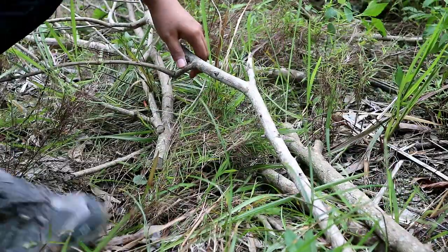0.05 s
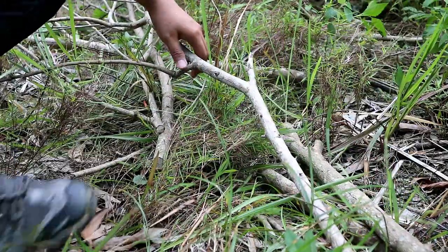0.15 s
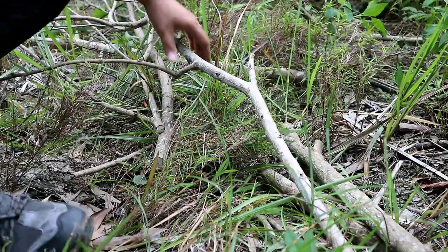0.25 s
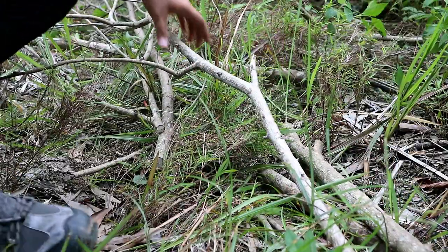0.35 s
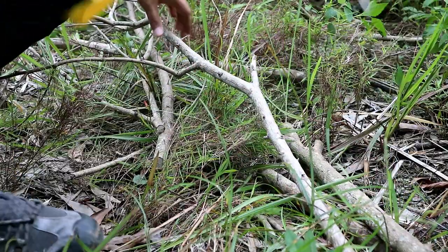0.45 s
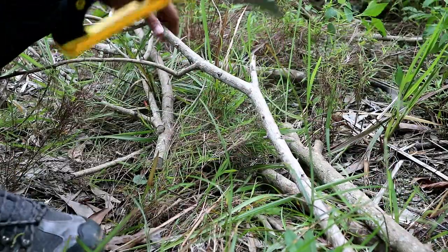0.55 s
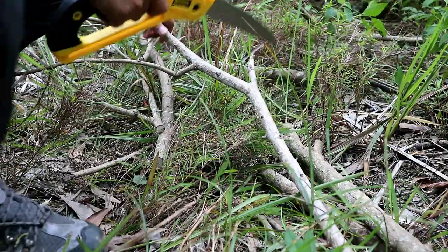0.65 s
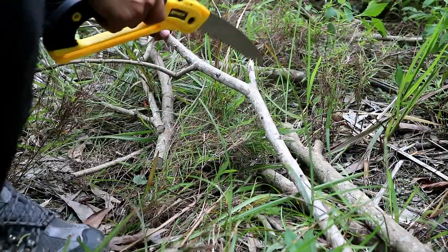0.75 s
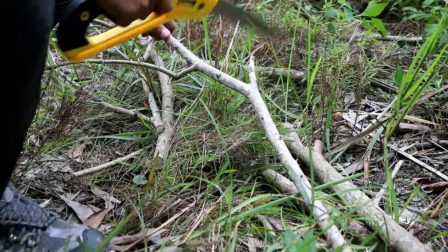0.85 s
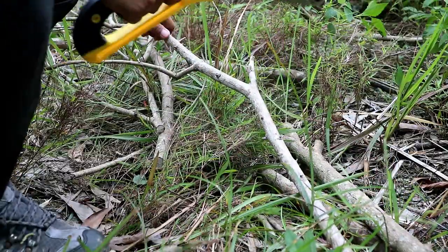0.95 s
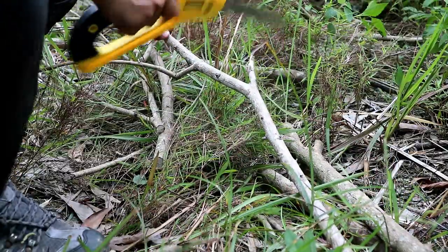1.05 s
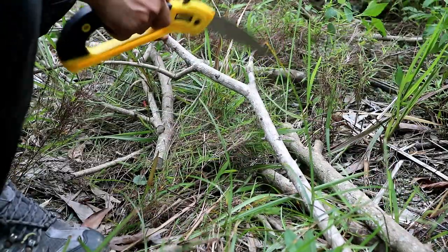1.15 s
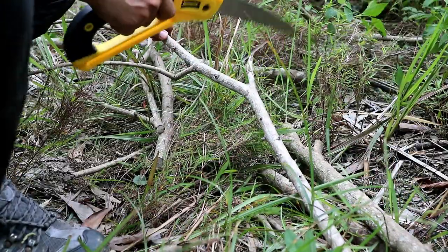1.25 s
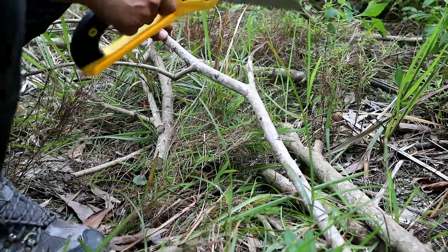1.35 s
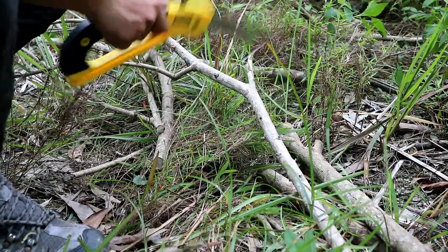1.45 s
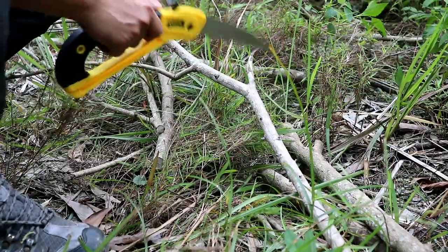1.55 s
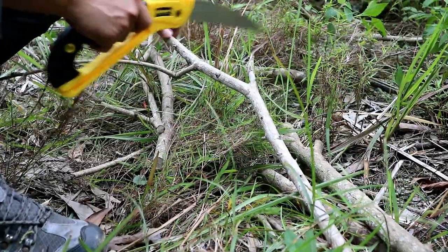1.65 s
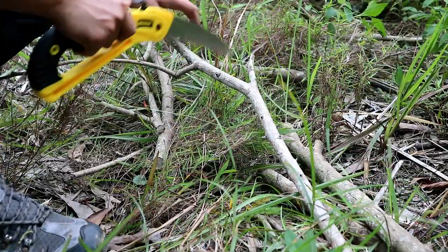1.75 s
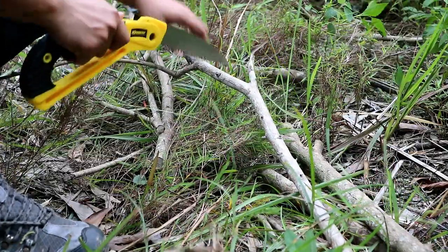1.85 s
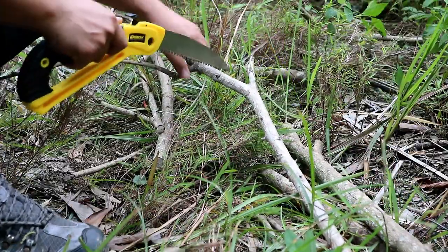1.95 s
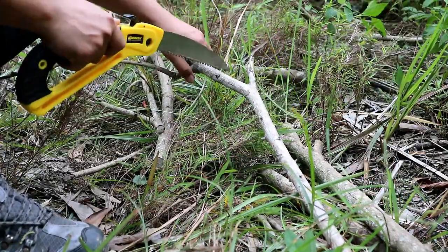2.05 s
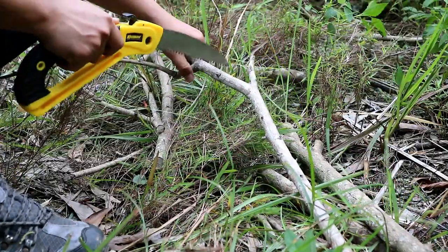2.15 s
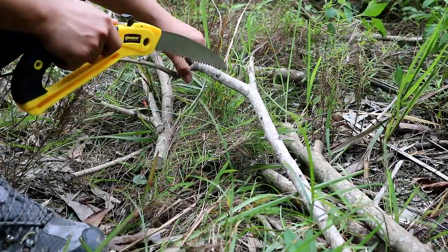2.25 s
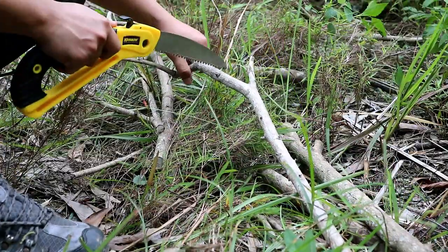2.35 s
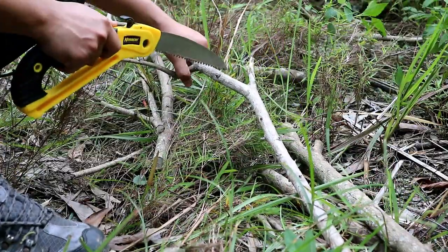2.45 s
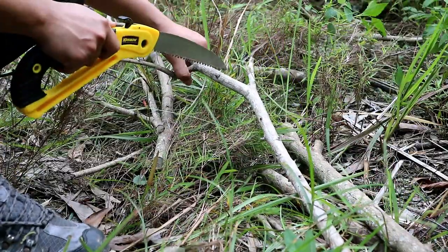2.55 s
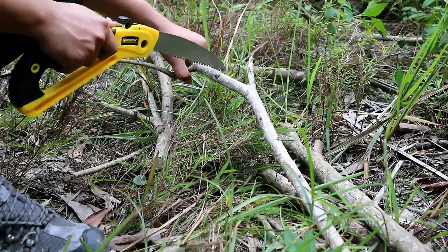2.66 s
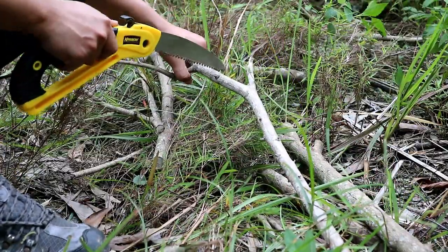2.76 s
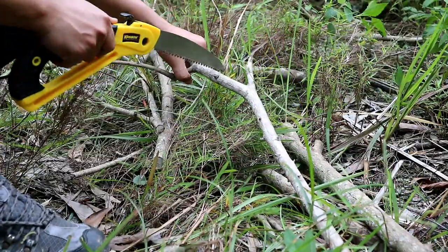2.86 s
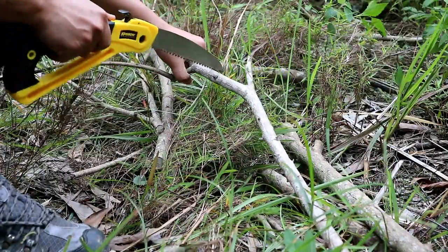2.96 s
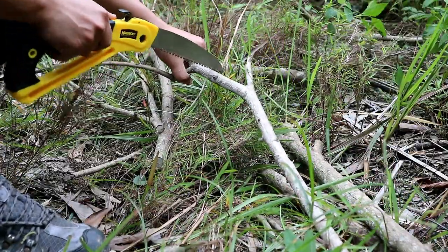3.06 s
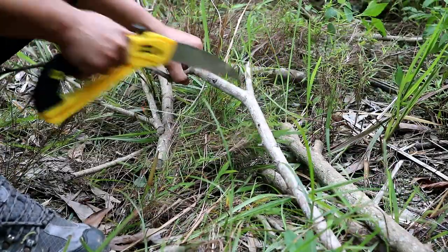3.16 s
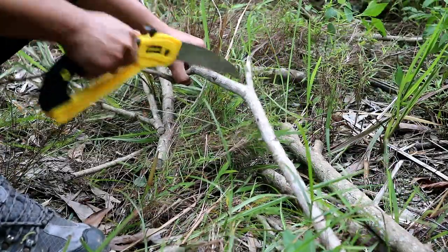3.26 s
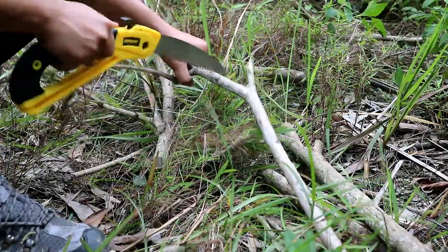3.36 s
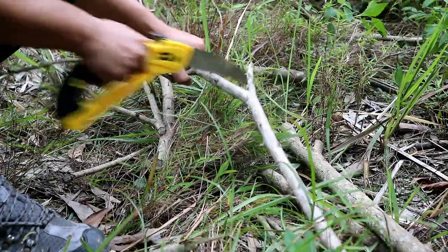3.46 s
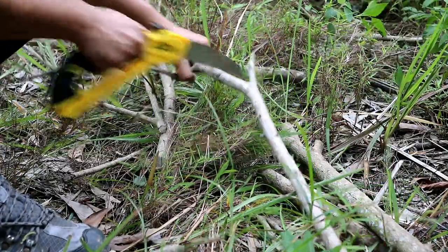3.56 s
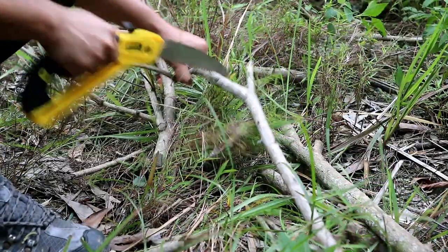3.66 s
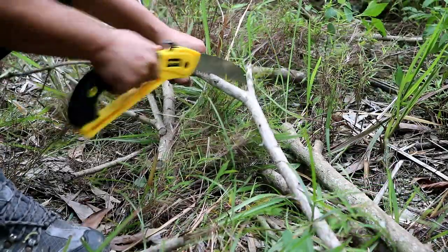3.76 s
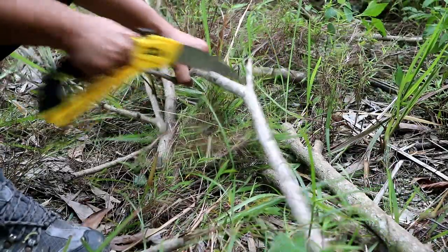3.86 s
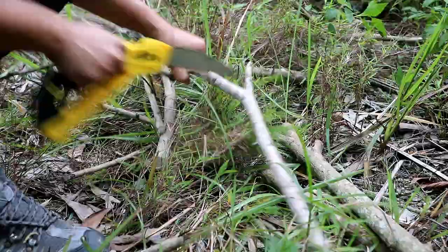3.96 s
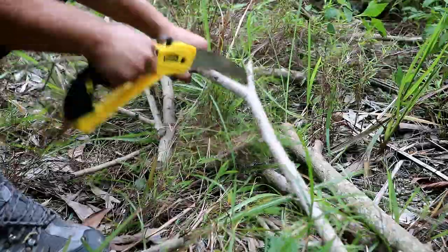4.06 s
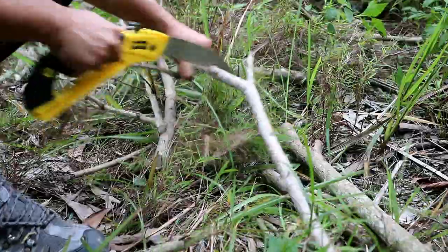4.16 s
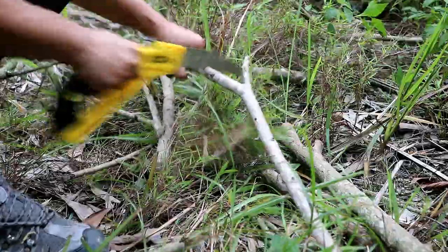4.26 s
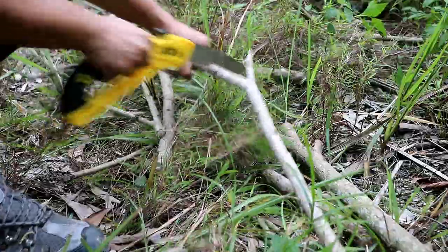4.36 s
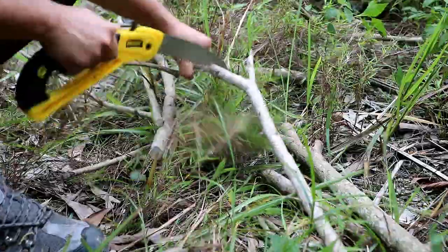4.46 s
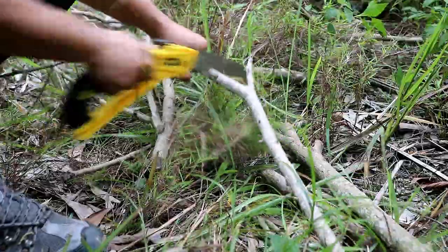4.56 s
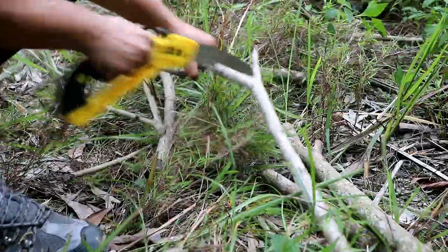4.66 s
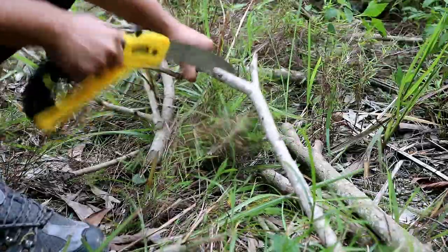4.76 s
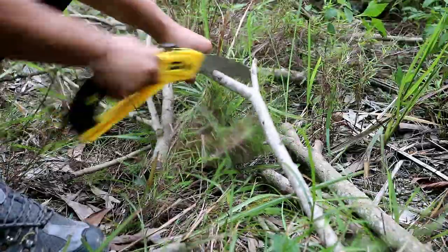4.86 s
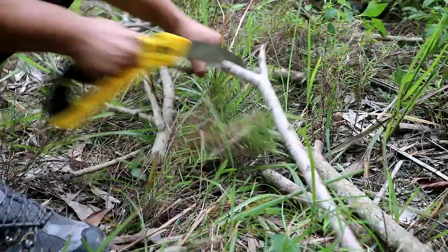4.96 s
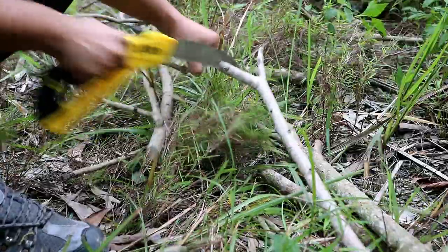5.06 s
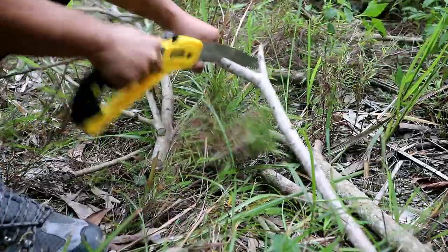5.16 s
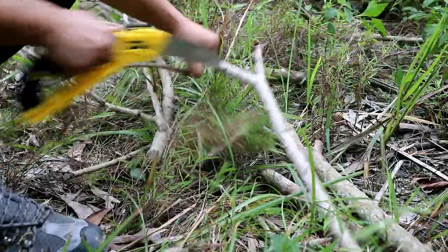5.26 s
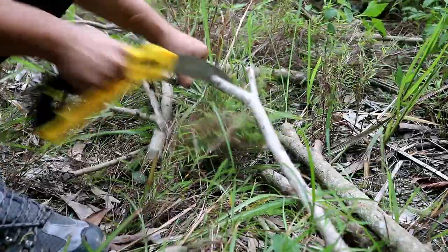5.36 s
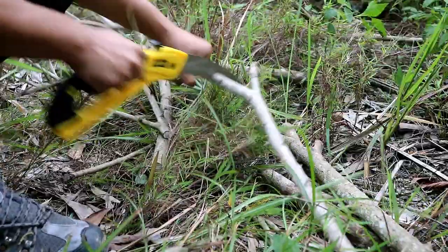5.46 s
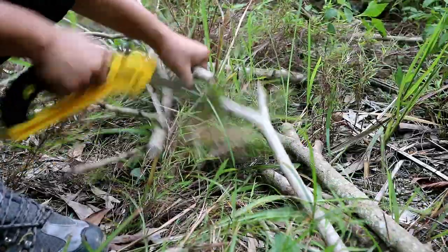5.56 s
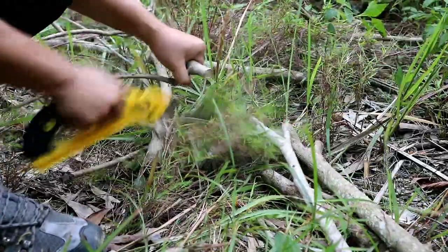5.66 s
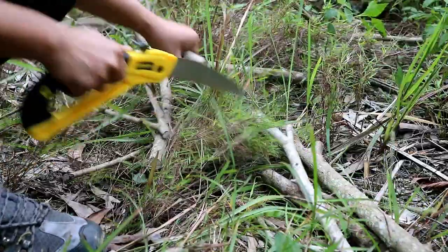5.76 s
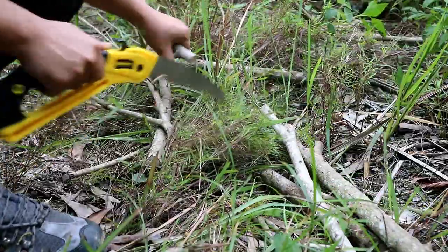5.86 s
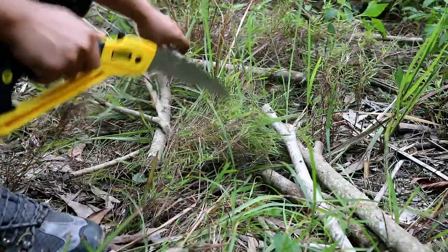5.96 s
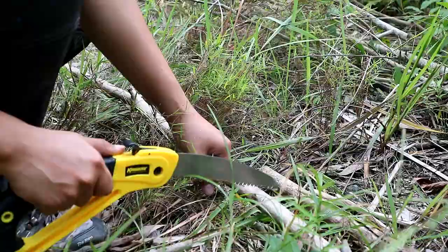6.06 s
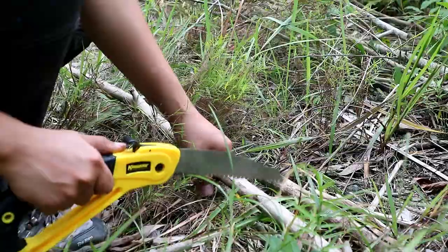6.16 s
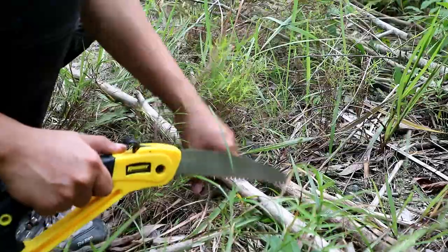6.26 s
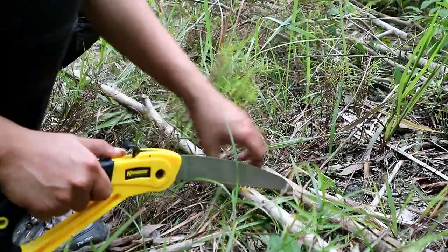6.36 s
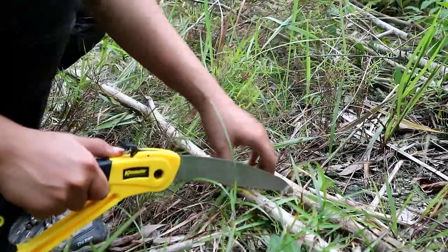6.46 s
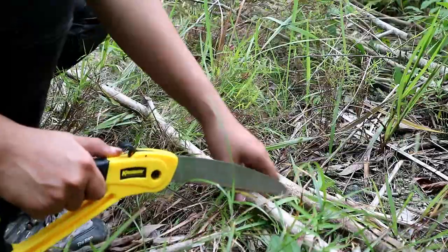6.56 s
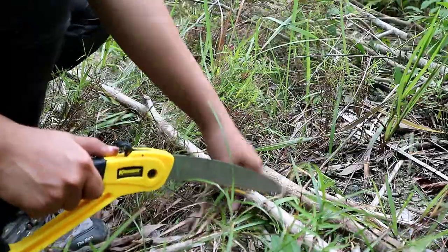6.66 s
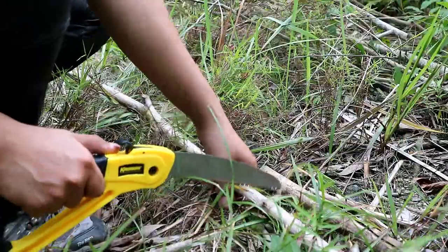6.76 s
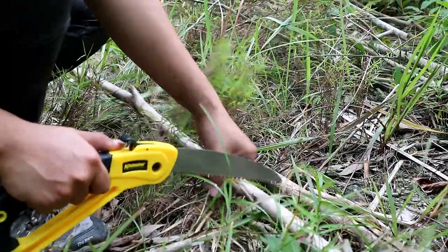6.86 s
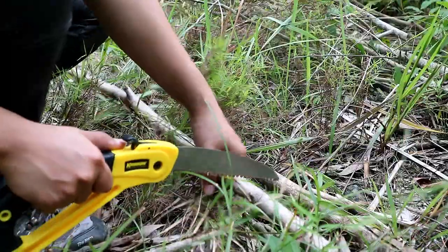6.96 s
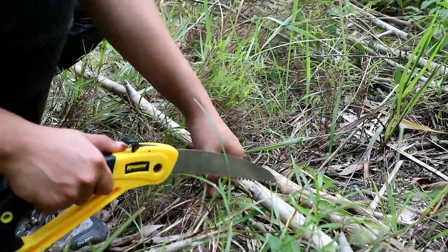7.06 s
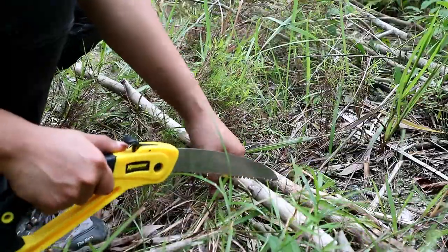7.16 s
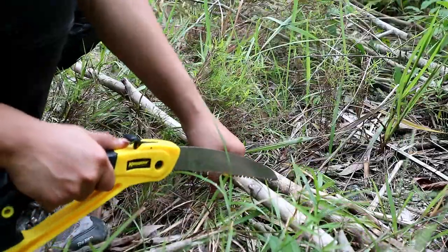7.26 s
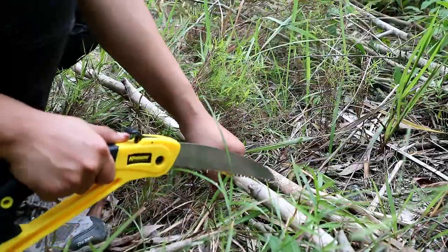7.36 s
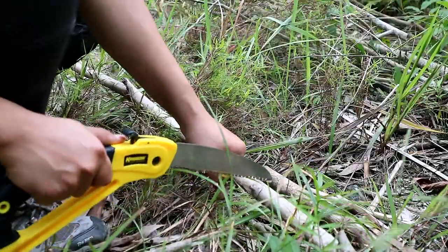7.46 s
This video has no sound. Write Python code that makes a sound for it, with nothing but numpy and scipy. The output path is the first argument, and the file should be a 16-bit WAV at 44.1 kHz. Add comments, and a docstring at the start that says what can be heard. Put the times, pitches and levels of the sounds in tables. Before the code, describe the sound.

Handling taps on wood and steel come first, over a soft airy wash and thin high crickets. A dulled far rooster calls. Seventeen rapid rasping strokes follow, bright, gritty and increasingly fizzy, peppered with splintering ticks. A hard snap ends the cut; the stick knocks and swishes into grass. Small leafy rustles close the nearby, dry outdoor scene.

```python
"""Sawing a dry branch

A folding saw is unfolded and set on a dry branch, cuts it in seventeen quick strokes; the branch cracks and drops
into the grass. Saw: tooth bites and fibre tears drive resonances. Cracks, taps, knocks: struck modes. Grass: clumped
grains. Air: shaped noise. Crickets: throbbing noise bands and drooping pips. Far rooster and low hum: gliding tones.
"""
import sys
import numpy as np
from scipy import signal
from scipy.fft import rfft, irfft
from scipy.io import wavfile
from scipy.ndimage import uniform_filter1d

SR = 44100
rng = np.random.default_rng(int(sys.argv[2]) if len(sys.argv) > 2 else 0)


def log_audio(samples):
    """Write samples as a 16-bit WAV file to the path given in sys.argv[1]."""
    # one column per channel
    frames = np.atleast_2d(samples).T
    # limit to full scale, then quantise
    limited = np.clip(frames, -1, 1)
    pcm = np.round(limited * 32767).astype(np.int16)
    wavfile.write(sys.argv[1], SR, pcm)


N = 331191


def amp(db):
    """Decibels to amplitude factor."""
    return 10 ** (np.asarray(db) / 20)


def evened(x):
    """Scales to an overall RMS of 1."""
    return x / np.sqrt(np.mean(x ** 2) + 1e-20)


def smooth_noise(shape, window):
    """White noise under a moving average of `window` samples."""
    return uniform_filter1d(rng.standard_normal(shape), window)


def butter(x, order, hz, kind="low"):
    """Butterworth filter."""
    return signal.sosfilt(signal.butter(order, hz, kind, fs=SR, output="sos"), x)


def read(points, hz):
    """Interpolates a table of (hz, value) along log frequency."""
    f, value = np.transpose(points)
    return np.interp(np.log(hz + 1), np.log(f + 1), value)


def add(mix, start_s, sound):
    """Adds a sound to the mix in place, cut at the end."""
    part = mix[..., round(start_s * SR):][..., :sound.shape[-1]]
    part += sound[..., :part.shape[-1]]


def panned(x, pan_db):
    """Sets the left-over-right level difference."""
    return x * amp([[pan_db / 2], [-pan_db / 2]])


def resonate(x, hz, width_hz):
    """Shifts the curve hz down to zero, smooths, shifts back: a resonance of gain 1."""
    turn = np.exp(2j * np.pi * np.cumsum(hz * np.ones(x.shape[-1])) / SR)
    r = np.exp(-np.pi * width_hz / SR)
    return 2 * (turn * signal.lfilter([1 - r], [1, -r], x / turn)).real


def coloured(x, points):
    """Filters by a spectrum in dB."""
    return irfft(rfft(x) * amp(read(points, np.fft.rfftfreq(N, 1 / SR))), N)


def grains(per_s, spread_db):
    """Random clicks, most small, a few large."""
    when, size, sign = rng.random(N), rng.exponential(1, N), rng.standard_normal(N)
    return (when < per_s / SR) * amp(spread_db * np.minimum(size, 5)) * sign


def struck(modes, push, tick_db, dull, rattle_t60_s, low_hz):
    """A push and a rattle ring the modes, a little unlike in each ear; peak 1. A dull blow loses treble."""
    t = np.arange(5000) / SR
    noise = rng.standard_normal((3, len(t)))
    lumps_db = 2.5 * evened(smooth_noise(len(t), 60))
    rattle = (noise[0] + .5 * noise[1:]) * amp(lumps_db - 60 * t / rattle_t60_s)
    force = (t == 0) * push + rattle
    ring = 0
    for k, (hz, db, decay_s) in enumerate(modes):
        detuned_hz = hz * rng.uniform(.97, 1.03)
        ring = ring + (-1) ** k * amp(db) * evened(resonate(force, detuned_hz, 3.2 / decay_s))
    tick = amp(tick_db - 60 * t / 0.031) * noise[1:]
    blow = butter(ring / abs(ring).max() + tick, 2, [low_hz, 9000], "band")
    blow = signal.lfilter([1], [1, -np.clip(dull, 0, .9)], blow)
    return blow / abs(blow).max()


# air spectrum: hz, relative_db_per_hz
AIR_SPECTRUM = [(15, -37), (35, -11), (58, 1), (75, -5), (100, -4), (129, -1), (378, 2.5), (509, 2),
                (1530, -10.5), (2770, -13), (3340, -15.5), (4620, -13.5), (6730, -17.5), (7700, -2),
                (8580, -33.5), (11500, -34), (12800, -32), (15500, -49.5)]
# left-right correlation of the air: hz, likeness
AIR_LIKENESS = [(60, -0.18), (180, -0.83), (550, -0.77), (1650, -0.22), (4970, -0.41), (15000, -0.26)]
AIR_DB = -56.5


def air():
    """Steady wash of far wind and traffic: noise spectrum with drifting patches."""
    frames, hz = N // 256 + 5, np.fft.rfftfreq(1024, 1 / SR)
    a, b, c, d, patches = rng.standard_normal((frames, 513, 5)).T
    patches = evened(uniform_filter1d(uniform_filter1d(patches, 12, 0), 14, 1))
    same = np.clip(read(AIR_LIKENESS, hz), -1, 1)[:, None]
    left = a + 1j * b
    right = same * left + np.sqrt(1 - same ** 2) * (c + 1j * d)
    z = np.array([left, right]) * amp(read(AIR_SPECTRUM, hz)[:, None] + 2.2 * patches)
    return amp(AIR_DB) * evened(signal.istft(z, nperseg=1024, noverlap=768)[1][:, :N])


# far crickets: hz, width_hz (of each of two passes), relative_db
CHORUS_BANDS = [(7160, 100, -6), (7580, 80, -1.5), (7795, 72, 0)]
# trills of a nearer cricket: start_s, length_s, relative_db
CRICKET_TRILLS = [(0.026, 0.08, -64), (2.688, 0.175, -67), (2.916, .12, -70), (6.02, .05, -75),
                  (6.17, 0.15, -68), (7.138, 0.18, -65)]
CHORUS_DB = -66


def chorus(t):
    """Narrow noise bands throb in wing strokes grouped by about three."""
    drift = 2 * np.pi * np.cumsum(1 + 0.0906 * evened(smooth_noise(N, 9000))) / SR
    throb = (1 + .5 * np.sin(18.8 * drift)) * (1 + 0.18 * np.sin(54 * drift))
    hiss = rng.standard_normal((2, N))
    bands = sum(amp(db) * evened(resonate(resonate(hiss, hz, w), hz, w)) for hz, w, db in CHORUS_BANDS)
    return amp(CHORUS_DB) * evened(throb * bands)


def crickets():
    """A throbbing chorus; one cricket trills in pips that droop at the end."""
    t = np.arange(N) / SR
    out = chorus(t)
    for start_s, length_s, db in CRICKET_TRILLS:
        u = t[:round(length_s * SR)]
        phase = np.minimum(u * 32. % 1 / .9, 1)  # 32 pips/s, each fills most of its beat
        pitch_hz = 4870 - 380 * phase ** 3.5 + 500.0 * smooth_noise(len(u), 60)
        pips = np.sin(2 * np.pi * np.cumsum(pitch_hz) / SR) * np.sin(np.pi * phase ** .6) ** 1.5
        # a soft noise band fills between the pips
        blur = .18 * evened(resonate(resonate(rng.standard_normal(len(u)), 4620, 450), 4620, 450))
        swell = np.sin(np.pi * u / length_s) ** 1.2
        add(out, start_s, panned(amp(db - 3.) * 2 * (pips + blur) * swell, 0))
    return out


# crow, a table a syllable, the last two being two lines of the hoarse long one: time_s, pitch_hz, level_db
CROW_SYLLABLES = [
    [(1.87, 540, -79), (1.92, 542, -54.5), (1.96, 555, -77)],
    [(2.07, 500, -85), (2.112, 570, -59), (2.16, 620, -80)],
    [(2.13, 701, -68), (2.168, 715, -58), (2.242, 723, -61), (2.26, 686, -74)],
    [(2.44, 590, -65), (2.76, 572, -66)],
    [(2.42, 536, -64), (2.47, 715, -66), (2.6, 735, -63), (2.772, 673, -60), (2.822, 648, -69),
     (2.858, 559, -62), (2.91, 556, -57), (2.93, 528, -74)],
]


def rooster():
    """A wavering, hoarse tone that distance has dulled to its lowest partial, with long echoes."""
    voice = np.zeros(N)
    for rows in CROW_SYLLABLES:
        s, hz, db = np.transpose(rows)
        t = np.arange(s[0], s[-1], 1 / SR)
        waver = 1 + 0.028 * evened(smooth_noise(len(t), 300))
        tone = np.sin(2 * np.pi * np.cumsum(np.interp(t, s, hz) * waver) / SR)
        add(voice, s[0], amp(np.interp(t, s, db)) * tone * signal.windows.tukey(len(t), .2))
    t = np.arange(SR // 2) / SR
    echoes = rng.standard_normal((2, len(t))) * amp(-60 * t / 0.4)
    echoes = echoes / np.linalg.norm(echoes[0])
    return panned(voice, 9.0) + amp(-1.5) * signal.oaconvolve(voice[None], echoes, axes=1)[:, :N]


# low hum that wavers under the sawing: time_s, pitch_hz, level_db
HUM_GLIDE = [(3.92, 147, -66), (4.02, 125, -62), (4.112, 115, -63), (4.22, 114, -68), (4.304, 128, -69),
             (4.516, 118, -67), (4.728, 130, -69), (4.852, 158, -66), (4.958, 131, -62), (5.06, 112, -68)]


def hum():
    """One soft low gliding sine, out of step in the two channels."""
    s, hz, db = np.transpose(HUM_GLIDE)
    t = np.arange(s[0], s[-1], 1 / SR)
    out = np.zeros((2, N))
    lead_rad = np.array([[0], [1.2]])
    tone = amp(np.interp(t, s, db)) * np.sin(2 * np.pi * np.cumsum(np.interp(t, s, hz)) / SR + lead_rad)
    add(out, s[0], tone * signal.windows.tukey(len(t), .1))
    return out


# swishes of grass, some swelling slowly; near 6.06 s the sound breaks off abruptly: # peak_s, relative_db,
# swell_s_per_10db, fade_s_per_10db, tilt_db_per_octave
GRASS_SWISHES = [(.24, -58, .55, .5, -1.2), (1.82, -70, .9, 2.5, -4), (5.44, -52, .02, .2, 2),
                 (5.53, -38, .006, .09, 2), (5.72, -43, .03, .03, -1.5), (5.8, -49.5, .08, .08, -.3),
                 (5.99, -50, .16, .05, .1), (6.062, -56, .1, .008, -1), (6.22, -68, .015, .3, 2.5),
                 (6.42, -63, .3, .07, 1.2), (6.69, -63.5, .14, .3, 2), (6.846, -58, .04, .11, 1.5),
                 (7.008, -56.5, .04, .09, .1), (7.474, -63.5, .07, .04, 2.5)]
# leaf spectrum: hz, relative_db_per_hz
LEAF_SPECTRUM = [(88, -41), (150, -7.5), (263, -10), (618, -0.5), (1000, -1), (1760, -2), (2860, -2),
                 (5650, -7.5), (7560, -13.5), (15500, -28)]


def rustle():
    """Clumps of tiny leaf snaps over a soft swish."""
    t = np.arange(N) / SR
    s, db, swell, fade, tilt_db = np.transpose(GRASS_SWISHES)[..., None]
    clumps = amp(1.4 * evened(smooth_noise(N, 500)))
    shared = grains(3000, 2.8) * clumps
    pair = np.array([evened(shared) + 1.4 * evened(grains(8000, 0.71) * clumps) for _ in range(2)])
    hz, frame_s, z = signal.stft(coloured(pair, LEAF_SPECTRUM), SR, nperseg=256)
    # levels refer to the 1-4 kHz band
    band = butter(coloured(pair.mean(0), LEAF_SPECTRUM), 2, [1000, 4000], "band")
    z = z / np.sqrt(np.mean(band ** 2))
    power = amp(db - 10 * np.maximum((s - t) / swell, (t - s) / fade)) ** 2
    tilt_db = np.interp(frame_s, t, (tilt_db * power).sum(0) / power.sum(0))
    z = z * amp(np.log2((hz[:, None] + 100) / 2000) * tilt_db)
    return panned(signal.istft(z, SR, nperseg=256)[1][:, :N] * np.sqrt(power.sum(0)), 3.5)


# the steel blade is touched or clicks: start_s, peak_db, left_right_db, ring_hz, tick_over_ring_db, rattle_t60_s
BLADE_TAPS = [(0.237, -43, 17, 2900, -5, .06), (0.26, -42, 18, 2850, 1, .06),
              (1.153, -23.5, 3, 2850, -2, .03), (1.163, -38, 3, 2850, -8, .07),
              (1.1775, -38, 3.5, 2720, -5, .04), (1.1905, -44, 3, 2750, -8, .09),
              (1.477, -50, 9, 3100, -4, .02), (1.5288, -33, 4, 3000, -5, .05),
              (1.538, -44, 3, 2750, -3, .08), (1.556, -43, 2, 2950, -2, .08),
              (1.602, -50, 2, 4550, -12, .03), (1.952, -46, 1, 3000, -12, .07),
              (1.967, -46, 1, 4550, -8, .03), (2.135, -36, 2, 2950, -12, .055),
              (2.2508, -47, 3.0, 2600, -3, .03), (5.7255, -28, 0, 2680, -8, .025)]
# blade modes: multiple_of_ring, relative_db, decay_s (to -87 dB)
STEEL_MODES = [(0.61, -13, 0.02), (.93, -2, .016), (1, 0, .018), (1.07, -2, 0.016), (1.2, -7, .01),
               (1.55, -5, 0.008), (1.7, -7, .012), (2.05, -11, 0.013)]
# sticks and handle knock: start_s, peak_db, pitch_hz, decay_s (divided per mode below), left_right_db
STICK_KNOCKS = [(0.265, -44, 840, 0.022, 16), (0.392, -53, 651, 0.044, 10), (0.704, -43, 716, 0.02, 10),
                (0.775, -42, 684, 0.025, 11), (0.803, -47, 666, 0.02, 9), (0.883, -47, 900, 0.012, 6),
                (0.906, -45, 293, 0.06, 3.0), (.905, -45, 1000, .012, 6), (.9155, -42, 950, .012, 8),
                (0.931, -35, 900, 0.013, 8), (.9375, -42, 1100, .016, 8), (.955, -46, 900, .012, 8),
                (0.9655, -38, 800, 0.017, 11), (1.1525, -31, 1250, 0.04, -1), (1.158, -46, 330, .07, 0),
                (1.166, -47, 1150, .03, 0), (1.192, -52, 950, .03, 0), (1.209, -53, 1050, .04, 0),
                (1.333, -37, 840, 0.016, 6), (1.527, -41, 1390, 0.02, -5), (1.532, -45, 330, .05, 0),
                (1.968, -52, 1100, .02, 2), (2.271, -37.5, 794, 0.018, 8), (5.5405, -19, 1200, 0.025, -1),
                (5.549, -28, 1100, .03, -1), (5.606, -37, 750, 0.036, 4), (5.712, -26, 1350, 0.03, -8),
                (5.716, -31, 900, .04, -8), (6.421, -50, 1860, 0.03, -4), (7.002, -56, 1090, 0.03, 1.5)]


def handling():
    """Taps rattle the blade; knocks are a few damped cycles of wood or plastic."""
    out = np.zeros((2, N))
    for s, db, pan_db, hz, tick_db, rattle_s in BLADE_TAPS:
        modes = [(ratio * hz, *rest) for ratio, *rest in STEEL_MODES]
        add(out, s, panned(amp(db) * struck(modes, 15., tick_db, 0.6, rattle_s, 260), pan_db))
    for s, db, hz, decay_s, pan_db in STICK_KNOCKS:
        modes = [(hz, 0, decay_s / 1.38), (1.5 * hz, -7, decay_s / 2.9),
                 (2.1 * hz, -5, decay_s / 2.5), (3.8 * hz, -18, decay_s / 2.5)]
        add(out, s, panned(amp(db) * struck(modes, 7., -22.0, 0.62, .7 * decay_s, 142), pan_db))
    return out


# fibres and twigs snap: start_s, peak_db, dullness_0_to_1, rattle_t60_s
WOOD_CRACKS = [(0.915, -46, 0.2, .014), (0.938, -48, 0.2, .014), (2.9372, -48, 0.3, .014),
               (2.9674, -45, 0.3, .014), (3.1743, -21, 0.9, .014), (3.3528, -19, 0.5, .014),
               (3.6062, -22, 0.3, .008), (3.6232, -21, 0.3, .006), (3.6396, -19.5, 0.8, .014),
               (3.6671, -11, 0.3, .005), (3.864, -21, .6, .01), (3.9165, -20, .5, .008),
               (4.2986, -24, 0.9, .008), (4.493, -26, .8, .014), (4.7374, -22, 0.64, .006),
               (5.0793, -15, 0.14, .014), (5.2464, -22.5, .9, .014), (5.3616, -13, 0.5, .005),
               (5.366, -16, 0.4, .005), (5.3987, -12, 0.2, .016), (5.405, -21, 0.6, .014),
               (5.4106, -3.5, 0.5, .006), (5.4134, -17, 0.7, .03), (5.433, -18.5, 0.5, .016),
               (5.4415, -24, 0.4, .014), (5.461, -28, 0.6, .014), (5.53, -6, 0, .03),
               (5.5665, -24, 0.1, .03), (5.756, -30, 0, .03), (5.797, -33, 0.1, .04),
               (6.239, -50, .2, .014), (6.287, -52, 0, .014), (6.332, -49, .4, .014),
               (6.6175, -46, 0.3, .014), (6.968, -44, 0.2, .014), (7.099, -44, 0.2, .014)]
# splinter modes: hz, relative_db, decay_s (to -87 dB)
SPLINTER_MODES = [(1900, -8.5, 0.015), (2590, 0, 0.0073), (3300, -1, 0.0079), (3830, -2, 0.015),
                  (4970, 1, .005), (6500, -1, 0.0033), (8400, -7, .003)]


def cracks():
    """Dry wood snaps: a tick and a very short ring."""
    out = np.zeros((2, N))
    for s, db, dull, rattle_s in WOOD_CRACKS:
        add(out, s, amp(db) * struck(SPLINTER_MODES, 10.0, -13.0, dull, rattle_s, 1500))
    return out


# one row a stroke: full_bite_s, rise_s, hold_s, bite_db, lean_over_hold_db, blade_ring_hz,
# thrum_over_bite_db, outer_ring_modes_db
SAW_STROKES = [(3.157, .024, .058, -30, -5, 2865, -12, -5), (3.308, .011, .064, -35, 4, 2790, -15, -5),
               (3.457, .049, .042, -31, 3, 2950, -14, -5), (3.585, .02, .079, -31, 1, 2780, -16, -3),
               (3.712, .05, .08, -30.5, -1, 2760, -13, -2), (3.866, .022, .061, -30, 0, 2770, -14, -1),
               (3.995, .04, .082, -31, -4, 2600, -13, -1), (4.13, .026, .082, -33, -6, 2650, -12, -1),
               (4.255, .008, .07, -33, 0, 2795, -11, -2), (4.404, .02, .082, -33, -2, 2850, -10, -1),
               (4.569, .069, .052, -29.5, -6, 2970, -10, -1), (4.69, .03, .074, -35, 4, 2680, -10, 0),
               (4.854, .075, .046, -32.5, 1, 3050, -11, 4), (4.962, .015, .066, -32, 3, 2990, -14, 2),
               (5.079, .003, .071, -38, 10, 3100, -14, 2), (5.246, .019, .064, -32, 2, 3200, -15, 2),
               (5.366, .01, .085, -39, -2, 3050, -10, 0)]
# the blade rests where it turns and peaks mid-hold
REST_DB, FALL_DB_PER_S, FULL_DB, ARCH_DB = -51.5, 475, -32, 1.4
# thrum and fizz grow along the hold and sink less than the blade at the turns (linger: dB per dB)
THRUM_SWELL_DB, THRUM_LINGER = 4, .35
FIZZ_DB, FIZZ_SWELL_DB, FIZZ_LINGER, FIZZ_GROWTH_DB_PER_S = -6, 2.5, .25, .8  # deeper cut, more fizz


def strokes(t):
    """Each stroke rises, holds and falls at one rate; ring and thrum glide from stroke to stroke."""
    bite_db, along = np.full(N, float(REST_DB)), np.zeros(N)
    for s, rise, hold, db, lean_db, *_ in SAW_STROKES:
        knots_db = [REST_DB, db, db + lean_db / 2 + ARCH_DB, db + lean_db]
        shape_db = np.interp(t, [s - rise, s, s + hold / 2, s + hold], knots_db)
        shape_db = shape_db - FALL_DB_PER_S * np.maximum(t - s - hold, 0)
        along = np.where(shape_db > bite_db, np.clip((t - s) / hold, 0, 1) - .5, along)
        bite_db = np.maximum(bite_db, shape_db)
    s, _, hold, _, _, hz, thrum_db, top_db = np.transpose(SAW_STROKES)
    middle_s = s + hold / 2
    slack_db = np.maximum(FULL_DB - bite_db, 0)
    thrum_db = np.interp(t, middle_s, thrum_db) + THRUM_SWELL_DB * along + THRUM_LINGER * slack_db
    fizz_db = FIZZ_DB + FIZZ_GROWTH_DB_PER_S * (t - s[0]) + FIZZ_SWELL_DB * along + FIZZ_LINGER * slack_db
    return bite_db, np.interp(t, middle_s, hz), thrum_db, fizz_db, np.interp(t, middle_s, top_db)


TEETH_PER_S, TEARS_PER_S = 330, 5000  # teeth: mean rate at full speed


def tooth_bites(t, bite_db):
    """Uneven decaying bites, one a tooth; harder bite means faster teeth."""
    speed = np.clip((bite_db - REST_DB) / (FULL_DB - REST_DB), .2, 1)
    count = np.cumsum(TEETH_PER_S * speed * (1 + 4. * smooth_noise(N, 200))) / SR
    tooth = amp(3.6 * rng.standard_normal(N)[count.astype(int) % N])
    return .6 + np.exp(-(count % 1) / .4) * tooth


def tears(bites, grip, apart):
    """Tear grains shaped by the bites; both ears share most, some face one ear only."""
    shared = grains(TEARS_PER_S, 1.02)
    return bites ** grip * (shared + apart * np.array([grains(TEARS_PER_S, 0.6) for _ in range(2)]))


# blade in the cut: multiple_of_ring, width_hz, relative_db
RING_MODES = [(.66, 480, -4.5), (.86, 460, 0.5), (1, 480, 1.5), (1.16, 560, -1.5), (1.38, 600, -4.5)]


def blade_ring(steel, blade_hz, top_db, wander):
    """Blade modes wander at random in pitch and strength around the ring of the stroke."""
    ring = 0
    for k, (ratio, width_hz, db) in enumerate(RING_MODES):
        level_db = db + 1.2 * wander[0, k] + top_db * (k in (0, len(RING_MODES) - 1))
        hz = ratio * blade_hz * (1 + 0.028 * wander[1, k])
        ring = ring + (-1) ** k * amp(level_db) * resonate(steel, hz, width_hz)
    ring = resonate(ring, blade_hz, 4200)
    # short-term level evened, so the bite curve sets the loudness
    return evened(ring / np.sqrt(uniform_filter1d((ring ** 2).mean(0), 1300)))


# saw modes that stay put: hz, width_hz, relative_db
PLATE_MODES = [(1065, 80, -6), (1850, 110, -2), (2300, 110, -3), (2560, 90, 0), (2750, 110, 0),
               (2980, 110, -2), (3200, 110, -4), (3500, 120, -2), (3950, 110, -2), (4870, 90, -2),
               (5780, 170, -4), (6620, 180, -6)]


def plate_ring(steel, blade_hz, wander):
    """Saw modes of fixed pitch and wandering strength; those near the blade ring speak loudest."""
    plate = 0
    for k, (hz, width_hz, db) in enumerate(PLATE_MODES):
        level_db = db + 3.5 * wander[k % 3, k % len(RING_MODES)]
        mode = evened(signal.lfilter(*signal.iirpeak(hz, hz / width_hz, SR), steel))
        plate = plate + (-1) ** k * amp(level_db) * mode
    return evened(resonate(evened(plate), blade_hz, 2600))


# branch under the teeth: hz, width_hz, relative_db
THRUM_MODES = [(245, 165, -6.5), (436, 145, -3.5), (656, 190, -3), (1025, 270, 3.5), (1450, 330, 0.5)]


def branch_thrum(wood, wander):
    """Broad low wood modes that wander in pitch and strength."""
    thrum = 0
    for k, (hz, width_hz, db) in enumerate(THRUM_MODES):
        mode = resonate(wood, hz * (1 + 0.089 * wander[1, k]), width_hz) / np.sqrt(width_hz)
        thrum = thrum + (-1) ** k * amp(db + 2.2 * wander[2, k]) * mode
    return butter(butter(evened(thrum), 2, 2000), 2, 150, "high")


# tearing fibres: hz, relative_db_per_hz
FIZZ_SPECTRUM = [(2120, -26.5), (3400, -16), (3950, 4), (4300, -1), (4800, 6), (6200, 5), (7330, .5),
                 (8150, -5.5), (9200, -8), (14600, -24), (16000, -31)]
# over bite; the thump weakens as the cut deepens
BLADE_DB, PLATE_DB, SHAKE_DB, THUD_DB, THUD_FADE_DB_PER_S = -1.2, -6.5, -34.5, -42, 4.5


def saw():
    """Tooth bites and tearing fibres shake blade and branch; the rocking branch rumbles and thumps the ground."""
    t = np.arange(N) / SR
    bite_db, blade_hz, thrum_db, fizz_db, top_db = strokes(t)
    bites = tooth_bites(t, bite_db)
    steel, wood, fibre = tears(bites, 1.05, .75), tears(bites, 1.05, .6), tears(bites, .7, 1.05)
    wander = evened(uniform_filter1d(smooth_noise((3, len(RING_MODES), N), 1200), 1200))
    blade = blade_ring(steel, blade_hz, top_db, wander)
    plate = plate_ring(steel, blade_hz, wander)
    thrum = branch_thrum(wood, wander)
    fizz = evened(coloured(fibre, FIZZ_SPECTRUM))
    shake = evened(butter(wood.mean(0), 2, [130, 260], "band"))
    lurch = amp(4. * evened(smooth_noise(N, 2500)))
    thud = evened(butter(lurch * steel.mean(0), 2, [30, 80], "band"))
    thud_db = THUD_DB - THUD_FADE_DB_PER_S * np.maximum(t - SAW_STROKES[0][0], 0)
    cutting = np.interp(t, [3.125, 3.137, 5.47, 5.51], [0, 1, 1, 0])  # blade on the wood
    metal = amp(BLADE_DB) * blade + amp(PLATE_DB) * plate
    branch = amp(thrum_db) * thrum + amp(fizz_db) * fizz + amp(SHAKE_DB) * shake + amp(thud_db) * thud
    return cutting * amp(bite_db) * (metal + branch)


# balance of the microphone ports: hz, left_right_db
PORT_TILT = [(60, -4), (180, 3.5), (550, 5), (1650, -0.5), (4970, 0.0), (15000, 0.5)]
# phase of the microphone ports: hz, left_lead_rad
PORT_LEAD = [(300, 0), (2000, -.3), (3400, -.8), (4500, -1.9), (6500, -3), (8400, -3.7), (9300, -6.1),
             (16000, -6.3)]


def ports(x):
    """Two microphone ports hear the cut with unlike delay and balance."""
    hz = np.fft.rfftfreq(N, 1 / SR)
    half = amp(read(PORT_TILT, hz) / 2) * np.exp(.5j * read(PORT_LEAD, hz))
    return irfft(rfft(x) * np.array([half, 1 / half]), N)


def scene():
    """Sums the layers; saw and cracks pass through the ports."""
    return ports(saw() + cracks()) + hum() + handling() + rustle() + air() + crickets() + rooster()


EDGE_HZ = 15800


def record(dry):
    """The small microphone loses the deepest bass and the top treble; then the band limit."""
    heard = butter(dry, 2, [46, 12500], "band")
    return signal.oaconvolve(heard, signal.firwin(511, EDGE_HZ, window=("kaiser", 9), fs=SR)[None], "same")


dry = scene()
out = record(dry)
log_audio(out)
```